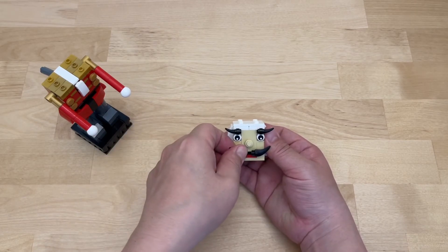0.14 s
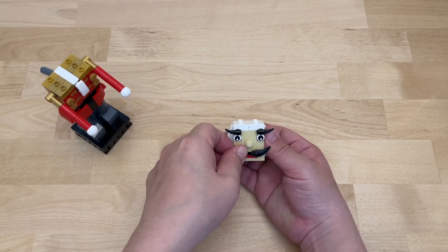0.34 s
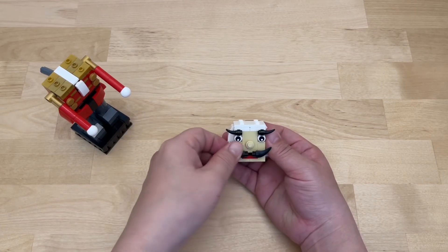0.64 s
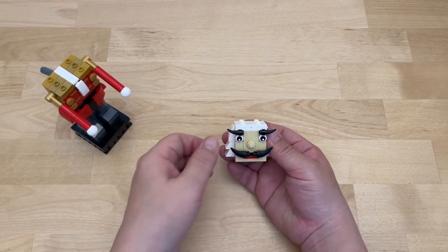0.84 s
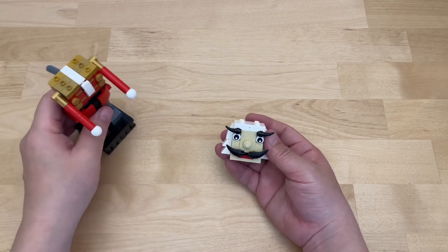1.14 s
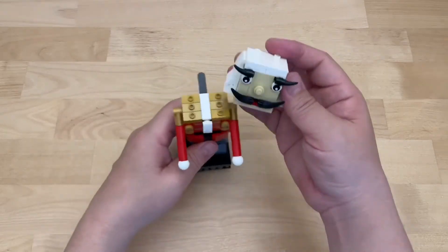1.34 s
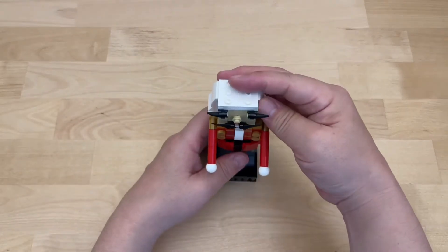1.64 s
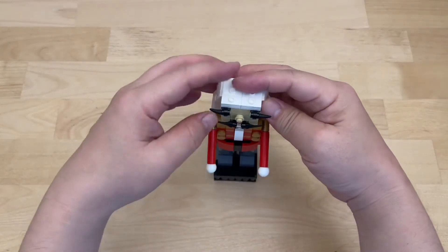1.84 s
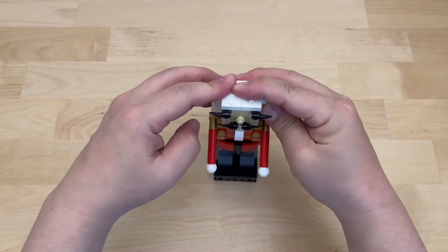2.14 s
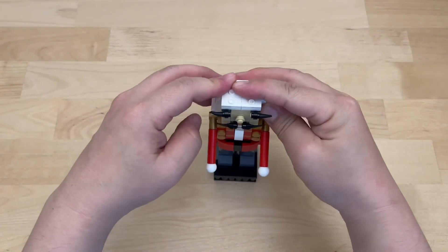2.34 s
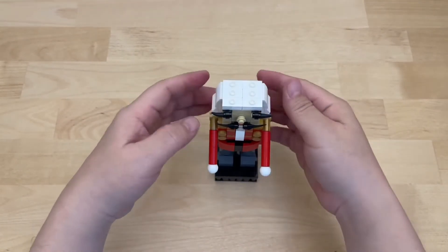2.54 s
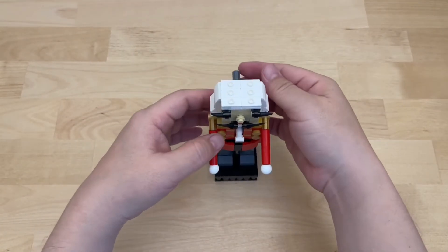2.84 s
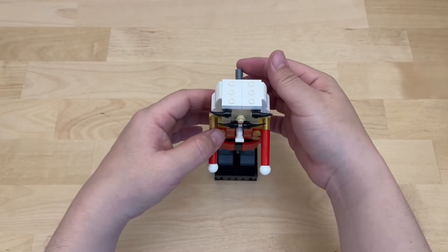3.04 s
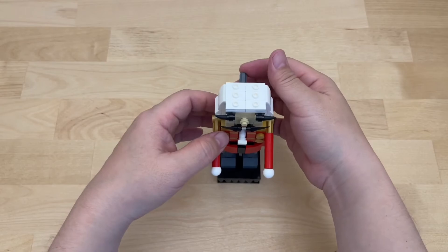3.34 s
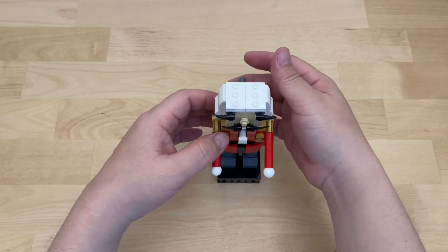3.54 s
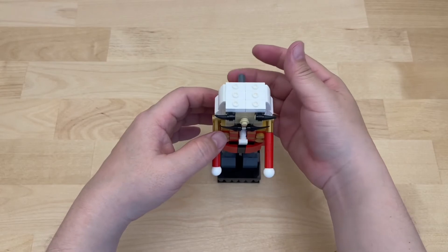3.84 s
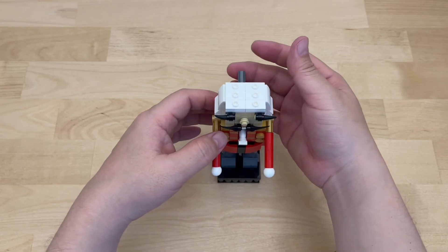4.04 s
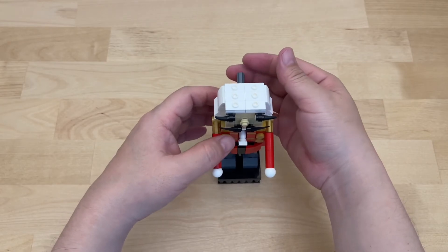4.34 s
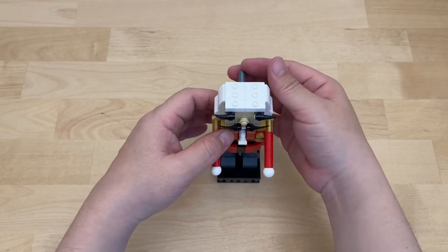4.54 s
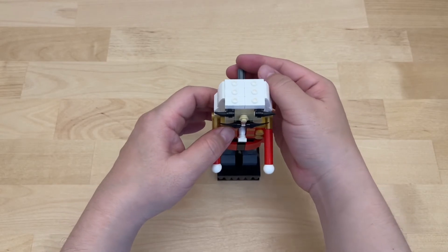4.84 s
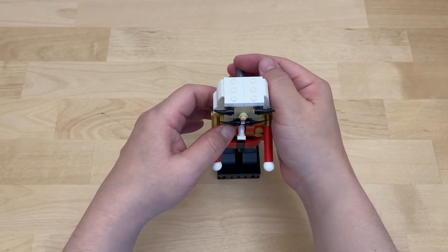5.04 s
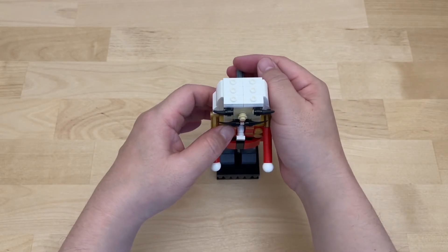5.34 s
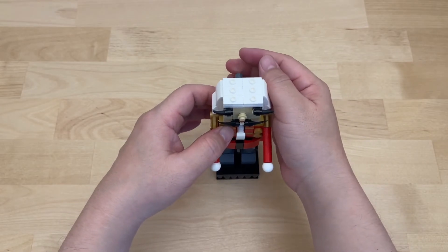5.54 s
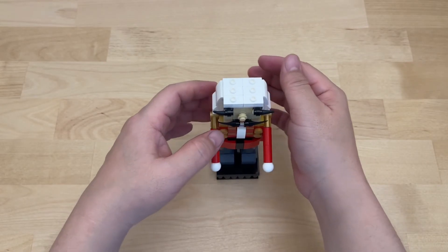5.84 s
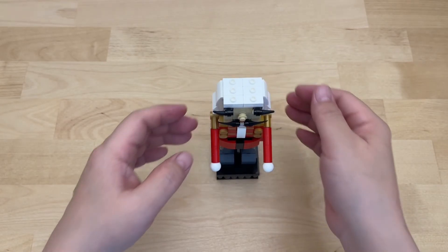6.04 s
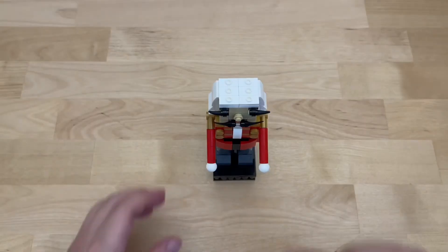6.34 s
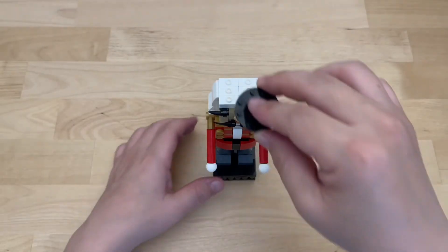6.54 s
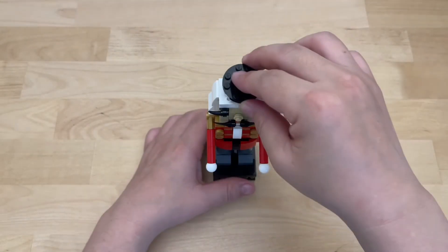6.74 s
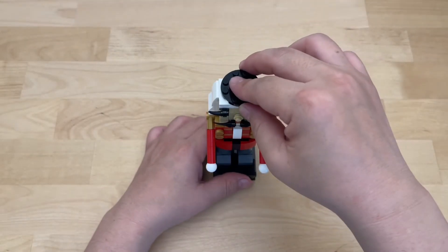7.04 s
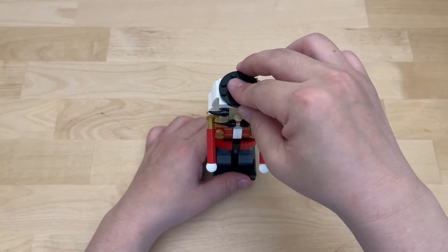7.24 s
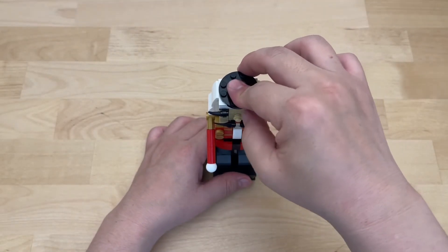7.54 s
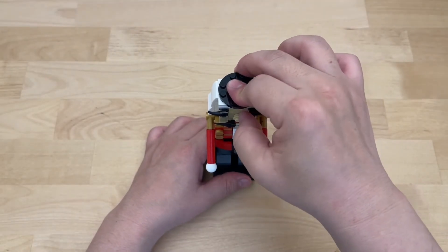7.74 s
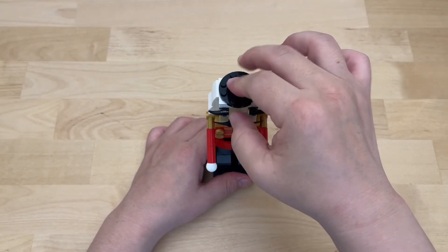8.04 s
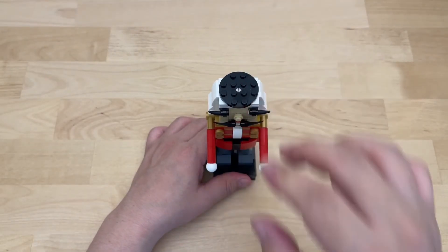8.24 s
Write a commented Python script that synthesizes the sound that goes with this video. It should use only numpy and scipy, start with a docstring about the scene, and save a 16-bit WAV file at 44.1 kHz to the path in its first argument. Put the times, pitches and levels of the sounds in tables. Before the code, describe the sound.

Quiet, close handling of hard plastic toy bricks on a wooden table, over the low rumble, hum and faint air noise of a small room. Faint ticks open, with a dull tick at 0.9 seconds, after which the background sinks until about 2.6. Bricks snap together in quick clusters around 1.5 and from 1.9 to 2.2 seconds, with hollow knocks and a soft low rub of the figure's base. From 3 to 3.5 seconds fingertips rub and briefly groan on the plastic. A small snap comes at 3.9, followed by light ticks of loose parts, then two snaps near 5.8. Another dull tick sounds at 6.3, and a forearm slides softly over the table around 6.5. Light clicks lead to a snap at 7.1 and a quick cluster near 7.5, with a few thin, bright ticks around 8 seconds.

```python
"""Hard plastic bricks snap together as hands build a figure on a wooden table.
Studs slip into their sockets and seat: each snap rings a small part, sounds the hollow figure and
knocks the table. Loose parts tick, fingers rub and groan on the plastic, a forearm slides.
A small room answers, over low rumble, hum and air noise that sink for a while."""
import sys
import numpy as np
from scipy import signal
from scipy.fft import rfft, irfft, next_fast_len
from scipy.io import wavfile
from scipy.ndimage import map_coordinates

SR = 44100
rng = np.random.default_rng(int(sys.argv[2]) if len(sys.argv) > 2 else 0)


def generate_wav(signal):
    """Clip the signal to [-1, 1] and save it as 16-bit WAV at the path in sys.argv[1]."""
    frames = np.transpose(np.atleast_2d(signal))
    scaled = np.clip(frames, -1, 1) * 32767
    pcm = np.round(scaled).astype(np.int16)
    wavfile.write(sys.argv[1], SR, pcm)


N = 370440

# Studs pressed home. Each row: time in seconds, click in dB, crack in dB, knock in Hz, knock in dB,
# part's ring in Hz, ring in dB, slip decay in seconds.
SNAPS = [(1.488, -53.5, -77, 167, -44.5, 1000, -45.5, 0.014),
         (1.515, -56, -83, 195, -53.5, 3660, -54.5, .0096), (1.5516, -59, -83, 225, -41, 654, -52, 0.008),
         (1.9418, -50, -76, 278, -40, 3750, -52.5, .0058), (2.049, -47, -56, 215, -44, 2450, -49.5, 0.0069),
         (2.146, -50.5, -57, 163, -46.5, 5350, -55, 0.0077), (3.874, -60, -83, 303, -60, 2206, -53, .0029),
         (3.8775, -58, -75, 311, -52.5, 2240, -49, 0.0036),
         (5.7606, -51.5, -64.5, 302, -44.5, 2180, -47.5, 0.0075),
         (5.8612, -57.5, -72, 335, -49, 1850, -53.5, 0.016),
         (7.1323, -51.5, -59, 230, -53, 1290, -52, 0.0045), (7.4542, -71, -86, 146, -41, 1560, -66, 0.0022),
         (7.461, -66, -79.5, 319, -46.5, 3430, -64, .0078), (7.522, -59, -76, 146, -62, 2440, -56, 0.003),
         (7.526, -63, -78, 150, -64, 2680, -57, .004), (7.5681, -58, -68, 164, -47, 3730, -57.5, 0.004),
         (7.576, -62, -86, 230, -52.5, 1250, -62, 0.01)]
# Light touches. Each row: time in seconds, click in dB, brightness in dB, part's ring in Hz,
# ring in dB, slip decay in seconds.
TOUCHES = [(0.137, -73, 5, 3580, -74.5, .003), (0.6424, -72.5, 9, 3730, -66.5, 0.0017),
           (1.1655, -66, 0, 1256, -59.5, 0.0086), (1.686, -72.5, -8, 3650, -71, 0.0053),
           (1.752, -76.5, -12, 1680, -72, 0.014), (1.8593, -70.5, -5, 900, -66, 0.0096),
           (2.7434, -74, -2, 1600, -65, .018), (2.85, -78, -4, 1300, -72.5, .009),
           (2.875, -65, -0.5, 2260, -66.5, .006), (3.039, -71.5, 3, 1090, -78, .008),
           (3.3924, -77.5, -2, 1730, -70, .005), (3.478, -74, -4, 1070, -75, 0.014),
           (4.4026, -76.5, -7, 1180, -78, 0.017), (4.518, -74, -3, 2250, -62, .006),
           (4.6495, -74.5, -5, 2300, -62, .0045), (5.5434, -65, 6.5, 5300, -66.5, .013),
           (5.922, -68, 0, 4000, -72, 0.017), (6.3726, -79, -1, 2030, -70, 0.011),
           (6.882, -68, 12.5, 1106, -69.5, 0.0025), (6.995, -64, 4.5, 2254, -53.5, 0.0027),
           (7.857, -63, 13.5, 2900, -63.5, .009), (8.0347, -64.5, 13.5, 2370, -71, 0.0055),
           (8.072, -69, -1, 1030, -76, .045), (8.178, -74.5, 11, 7670, -85, .009)]
# Resonances. Each row: centre in Hz, width in Hz, gain in dB.
BRICK_MODES = [(2300, 610, -3), (2900, 520, -2.5), (3650, 290, 1), (4700, 1370, -2.5), (5350, 684, 2.5),
               (6150, 1030, -5.5), (7400, 990, -7.5)]
CRACK_MODES = [(8600, 1800, 0), (10400, 2200, -4), (12600, 3000, -11)]
HOLLOW_MODES = [(900, 170, -5), (1070, 150, -1), (1250, 94, 0), (1600, 142, -1.5), (1880, 190, -12)]
TABLE_MODES = [(150, 112, -6.5), (230, 86, -1.5), (328.4, 52, 1.5), (442, 67, -1.5), (658, 86, -6.5)]
LOOSE_PART_MODES = [(1250, 130, -4), (2280, 180, 0), (2600, 200, -5), (4000, 400, -12), (5350, 400, -11)]
RUB_MODES = [(253, 48, 4.5), (335, 75, 2.5), (627, 103, -2.5), (1235, 194, -3.5), (2300, 420, -15),
             (5430, 3600, -27.5)]
SCUFF_MODES = [(1250, 99, 2.5), (2250, 330, -10), (3180, 330, -9), (3820, 160, -1.5), (5230, 430, -9.5)]
# Dull ticks. Each row: start in seconds, peak in dB.
DRY_TICKS = [(0.8939, -42.5), (6.2948, -42)]
# Fingertip drags. Each row: centre in seconds, level in dB, pitch in Hz, glide in Hz per second,
# half length in seconds.
GROANS = [(3.081, -52.5, 252, 498, 0.022), (3.16, -42, 253, 7, 0.014), (3.246, -60, 250.3, -2, 0.04),
          (3.337, -59, 233, 3, 0.029), (3.504, -61.5, 375, 1800, 0.028)]
# Friction swells. Each row: centre in seconds, level in dB, half length in seconds.
FINGER_STROKES = [(.48, -69, 0.024), (2.29, -72, 0.015), (2.43, -67.5, 0.016), (2.61, -69, .04),
                  (3.09, -63.5, 0.037), (3.175, -57.5, 0.039), (3.31, -69.5, 0.087), (4.87, -72.5, 0.094),
                  (5.12, -71.5, 0.028), (8.1, -75, 0.11)]
BASE_SHIFTS = [(1.5, -57, .15), (2.42, -57.5, 0.12)]
# Noise spectra. Each row: frequency in Hz, relative density in dB.
SLEEVE_SPECTRUM = [(200, -28), (700, 5), (1300, 6.5), (2000, -1), (3800, -0.5), (7000, -1.5), (11000, -11),
                   (15500, -13)]
RUMBLE_SPECTRUM = [(5, -17), (14, 3.5), (24, 6), (31, -7), (40, -15.5), (54, -13.5), (70, -28), (100, -32),
                   (160, -44.5), (300, -91)]
AIR_SPECTRUM = [(53, -17), (90, 6.5), (142, -6.5), (223, -6.5), (265, -10.5), (296, -17.5), (497, -21.5),
                (566, -17.5), (630, -25.5), (765, -24.5), (1230, -31.5), (1400, -30.5), (2260, -34),
                (2740, -33.5), (15800, -41)]
# Room decay. Each row: frequency in Hz, T60 in seconds.
ROOM_T60 = [(150, 0.59), (1300, 0.4), (5000, 0.33), (9000, 0.34), (15000, 0.2)]

# Early contacts start more softly, with a low thump; later ones start more sharply.
SOFT_ATTACK_UNTIL_S, SOFT_ATTACK_RISE_S, SHARP_ATTACK_RISE_S = 2.5, 0.0026, 0.001
THUMP_HZ, THUMP_WIDTH_HZ, THUMP_DB = 105, 50, -10  # table top, relative to the knock
DULL_HZ, DULL_WIDTH_HZ, DULL_DB = 2030, 80, -9  # band the figure hardly radiates
TOUCH_KNOCK_HZ, GRIP_DB = 282, -83
FIDGET_S, FIDGET_PER_S, FIDGET_DECAY_S = (2.6, 8.4), 5, 0.005
FIDGET_DB, FIDGET_SPREAD_DB = -80, 2.5
SLIDE_S, SLIDE_DB, SLIDE_ATTACK_S, SLIDE_RELEASE_S = (6.46, 6.576), -65, 0.041, 0.21
SWAY_S, SWAY_HZ, SWAY_DB, SWAY_FADE_S = (1.746, 2.184), 16.5, -34, 0.068
ROOM_SEND_DB, RUMBLE_DB, HUM_DB, HUM_HZ, AIR_DB = -8, -40, -55.5, 59.3, -60.5
# In the hush the background sinks; the room's answer is weaker and shorter.
HUSH_S, HUSH_FADE_S, HUSH_T60_SHARE = (0.925, 2.56), 0.043, 0.65
HUSH_RUMBLE_DB, HUSH_HUM_DB, HUSH_AIR_DB, HUSH_ROOM_DB = -10.5, -8.5, -3, -10.5
GAP_S, GAP_DB, GAP_FADE_S = (0.898, 0.912), -33, 0.0044
TOP_HZ = 15800


def snaps():
    """Studs snap home and knock the figure against the table."""
    out = np.zeros(N)
    for at_s, click_db, crack_db, knock_hz, knock_db, ring_hz, ring_db, slip_s in SNAPS:
        hollow_db = click_db - 0.5
        add(out, *contact(at_s, slip_s, click_db, hollow_db, crack_db,
                          knock_hz, knock_db, ring_hz, ring_db))
    return out


def contact(at_s, slip_s, click_db, hollow_db, crack_db, knock_hz, knock_db, ring_hz, ring_db):
    """Slipping studs drive table, hollow figure, brick walls and pushed part. Returns start, sound."""
    t = np.arange(-SR // 100, SR // 8) / SR
    soft_attack = at_s < SOFT_ATTACK_UNTIL_S
    rise_s = SOFT_ATTACK_RISE_S if soft_attack else SHARP_ATTACK_RISE_S

    def stud(share):
        return slip_force(t, rise_s, share * slip_s)

    push = unit(np.exp(-np.abs(t) / 0.00046)) + 0.31 * stud(0.66)
    knock = unit(resonate(push, [(knock_hz, 42, 0)]))
    knock += 0.65 * unit(resonate(stud(1), gripped(TABLE_MODES)))
    thump = soft_attack * amp(THUMP_DB) * unit(resonate(push, [(THUMP_HZ, THUMP_WIDTH_HZ, 0)]))
    body = amp(knock_db) * (unit(knock) + thump)
    body += amp(hollow_db) * unit(resonate(stud(1), gripped(HOLLOW_MODES)))
    body += amp(click_db) * unit(resonate(stud(1), gripped(BRICK_MODES)))
    body += amp(crack_db) * unit(resonate(stud(0.51), gripped(CRACK_MODES)))
    jolt = unit(1.0 * (t == 0)) + 0.5 * stud(0.99)
    ring = amp(ring_db) * unit(resonate(jolt, [(ring_hz, 110, 0)]))
    hush = gate(at_s, HUSH_S, HUSH_FADE_S, HUSH_FADE_S)
    tail = room_tail(t60_share=HUSH_T60_SHARE ** hush)
    send = body + 0.56 * ring  # the ring stays drier than the rest
    heard = amp(ROOM_SEND_DB + HUSH_ROOM_DB * hush) * signal.fftconvolve(send, tail)
    add(heard, 0, body + ring)
    level_scale = np.sqrt(0.02 * SR / len(t))  # levels are rms over 20 ms
    return at_s + t[0], level_scale * heard


def slip_force(t, rise_s, decay_s, spikiness=0.55, scatter_db=-9, scatter_t60_s=0.11):
    """Tiny slips build up, the stud seats at t = 0, then sound scatters off hands and table."""
    after_s = np.maximum(t, 0)
    envelope = np.exp(np.minimum(t, 0) / rise_s - after_s / decay_s)
    slips = rng.standard_normal(len(t))
    slips *= np.exp(spikiness * np.clip(rng.standard_normal(len(t)), -2, 2))
    scatter = rng.standard_normal(len(t)) * (t > 0) * amp(-60 * after_s / scatter_t60_s)
    return unit(slips * envelope) + amp(scatter_db) * unit(scatter)


def gripped(modes):
    """The grip detunes the modes anew at each contact."""
    return [(hz * np.exp(0.03 * rng.standard_normal()), width_hz, db) for hz, width_hz, db in modes]


def touches():
    """Light touches on loose parts: the brighter, the more crack and the less body."""
    out = np.zeros(N)
    for at_s, click_db, bright_db, ring_hz, ring_db, slip_s in TOUCHES:
        knock_db = click_db + 6.6 - 0.9 * bright_db
        hollow_db = click_db - 0.29 - 0.39 * bright_db
        crack_db = click_db - 18 + 1.2 * bright_db
        add(out, *contact(at_s, slip_s, click_db, hollow_db, crack_db,
                          TOUCH_KNOCK_HZ, knock_db, ring_hz, ring_db))
    return out


def fidgets():
    """Loose parts tick faintly at random in the hand."""
    out, t = np.zeros(N), np.arange(SR // 20) / SR
    span_s = FIDGET_S[1] - FIDGET_S[0]
    for when, size in rng.random((round(FIDGET_PER_S * span_s), 2)):
        force = rng.standard_normal(len(t)) * np.exp(-t / FIDGET_DECAY_S)
        db = FIDGET_DB + FIDGET_SPREAD_DB * (2 * size - 1)
        add(out, FIDGET_S[0] + when * span_s, amp(db) * unit(resonate(force, LOOSE_PART_MODES)))
    return out


def dry_ticks(decay_s=0.0006):
    """Two dull ticks with no ring."""
    out, t = np.zeros(N), np.arange(SR // 50) / SR
    for at_s, db in DRY_TICKS:
        add(out, at_s, amp(db) * np.exp(-t / decay_s))
    return out


def groans():
    """A dragging fingertip swells the figure's lowest resonance unsteadily."""
    out, t = np.zeros(N), np.arange(-SR // 8, SR // 8) / SR
    for at_s, db, hz, glide_hz_per_s, half_s in GROANS:
        jitter_hz = 12 * wobble(69.6)[:len(t)]
        phase = 2 * np.pi * np.cumsum(hz + glide_hz_per_s * t + jitter_hz) / SR
        envelope = amp(db) * np.exp(-(t / half_s) ** 2)
        add(out, at_s + t[0], envelope * np.sqrt(2) * np.sin(phase))
    return out


def finger_rub():
    """Skin catches on the figure in fine grains: faint grip plus strokes."""
    grains = rng.standard_normal(N) * amp(2.5 * wobble(160))
    return (amp(GRIP_DB) + swells(FINGER_STROKES)) * unit(resonate(grains, RUB_MODES))


def forearm_slide(t):
    """A sleeve hisses over the table and excites resonances under the arm."""
    hiss = noise(SLEEVE_SPECTRUM)
    scuff = unit(resonate(rng.standard_normal(N), SCUFF_MODES))
    envelope = amp(SLIDE_DB + 0.6 * wobble(41)) * gate(t, SLIDE_S, SLIDE_ATTACK_S, SLIDE_RELEASE_S)
    return envelope * unit(hiss + 0.69 * scuff)


def base_shift():
    """The figure's base shifts on the table with a low rub."""
    modes = [(94, 44, -4.5), (131.4, 31.4, -1.5), (225, 24, -14.5)]
    return swells(BASE_SHIFTS) * unit(resonate(rng.standard_normal(N), modes))


def table_sway(t):
    """The table sways under the pressing hands."""
    return amp(SWAY_DB) * gate(t, SWAY_S, SWAY_FADE_S, SWAY_FADE_S) * np.sin(2 * np.pi * SWAY_HZ * t)


def room_tail(t60_share, onset_s=0.0086):
    """A fresh room response of energy 1; treble dies first."""
    t = np.arange(SR // 2) / SR
    hz, frame_s, spectrum = signal.stft(rng.standard_normal(len(t)), SR, nperseg=256)
    t60_s = t60_share * log_interp(ROOM_T60, hz)[:, None]
    tail = signal.istft(spectrum * amp(-60 * frame_s / t60_s), SR, nperseg=256)[1][:len(t)]
    tail *= 1 - np.exp(-(t / onset_s) ** 2)
    return tail / np.linalg.norm(tail)


def room_noise(t):
    """Building rumble, motor hum, air with a faint fan; all drop out briefly, then sink in the hush."""
    hush = gate(t, HUSH_S, HUSH_FADE_S, HUSH_FADE_S)
    gap = gate(t, GAP_S, GAP_FADE_S, GAP_FADE_S)
    hum = amp(HUM_DB + HUSH_HUM_DB * hush + 1.4 * wobble(3.4)) * unit(np.sin(2 * np.pi * HUM_HZ * t))
    fan = amp(-13) * unit(resonate(rng.standard_normal(N), [(294.4, 20.4, -2.0), (413.4, 32, -7)]))
    rumble = amp(RUMBLE_DB + HUSH_RUMBLE_DB * hush) * noise(RUMBLE_SPECTRUM)
    air = amp(AIR_DB + HUSH_AIR_DB * hush) * (noise(AIR_SPECTRUM) + fan)
    return (rumble + hum + air) * amp(GAP_DB * gap)


def amp(db):
    """Decibels to gain."""
    return 10 ** (np.asarray(db) / 20)


def unit(x):
    """Scale to rms 1."""
    return x / np.sqrt(np.mean(x ** 2) + 1e-30)


def log_interp(points, hz):
    """Interpolate (Hz, value) points on a log frequency axis."""
    knots_hz, values = np.transpose(points)
    return np.interp(np.log(hz + 1), np.log(knots_hz + 1), values)


def wobble(knots_per_s):
    """Smooth random curve."""
    knots = rng.standard_normal(int(N * knots_per_s / SR) + 4)
    return map_coordinates(knots, [np.arange(N) * knots_per_s / SR])


def filtered(x, response):
    """Apply a complex frequency response."""
    size = next_fast_len(len(x) + SR // 10)
    return irfft(rfft(x, size) * response(np.fft.rfftfreq(size, 1 / SR)), size)[:len(x)]


def resonate(x, modes):
    """Parallel causal resonances of alternating sign."""
    return filtered(x, lambda hz: sum(
        (-1) ** k * amp(db) * 1j * hz * width_hz / (centre_hz ** 2 - hz ** 2 + 1j * hz * width_hz)
        for k, (centre_hz, width_hz, db) in enumerate(modes)))


def noise(spectrum):
    """Coloured noise of rms 1."""
    return unit(filtered(rng.standard_normal(N), lambda hz: amp(log_interp(spectrum, hz))))


def gate(t, span_s, attack_s, release_s):
    """1 within the span, linear ramps to 0 outside."""
    return np.clip(np.minimum(1 + (t - span_s[0]) / attack_s, 1 - (t - span_s[1]) / release_s), 0, 1)


def swells(rows):
    """Gain curve of bell-shaped swells."""
    t = np.arange(N) / SR
    return sum(amp(db) * np.exp(-((t - at_s) / half_s) ** 2) for at_s, db, half_s in rows)


def add(track, start_s, sound):
    """Mix a sound into the track."""
    part = track[max(0, round(start_s * SR)):][:len(sound)]
    part += sound[:len(part)]


def scene():
    """Mono mix above the table; contacts and handling pass a narrow notch."""
    t = np.arange(N) / SR
    unnotched = groans() + dry_ticks() + room_noise(t)
    figure = snaps() + touches()
    figure += finger_rub() + forearm_slide(t) + base_shift() + table_sway(t) + fidgets()
    figure = filtered(figure, lambda hz: amp(DULL_DB * np.exp(-((hz - DULL_HZ) / DULL_WIDTH_HZ) ** 2)))
    return (figure + unnotched)[None]


def record(dry):
    """Cut everything above TOP_HZ."""
    return np.array([filtered(x, lambda hz: hz < TOP_HZ) for x in dry])


dry = scene()
out = record(dry)
generate_wav(out)
```